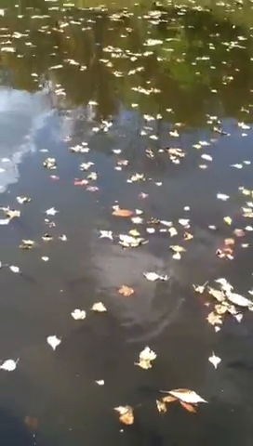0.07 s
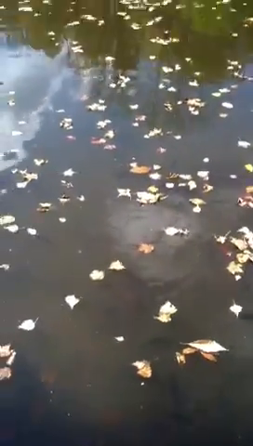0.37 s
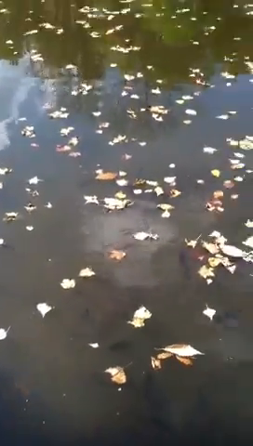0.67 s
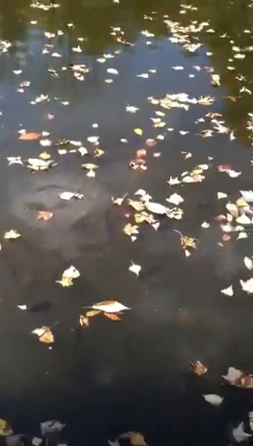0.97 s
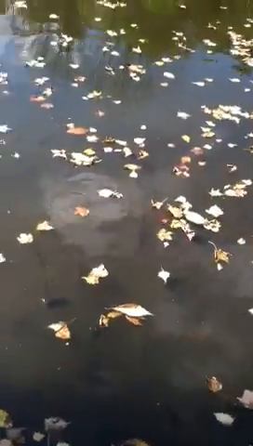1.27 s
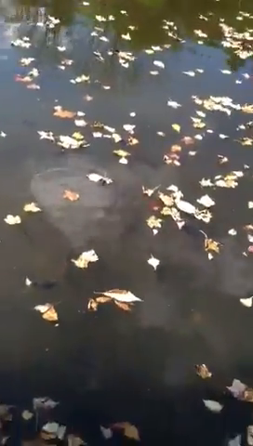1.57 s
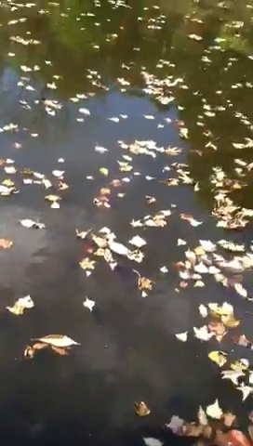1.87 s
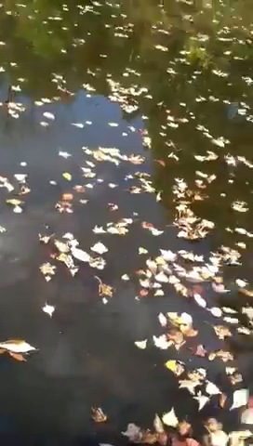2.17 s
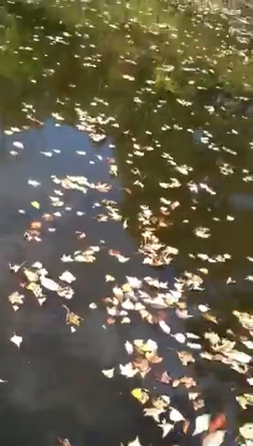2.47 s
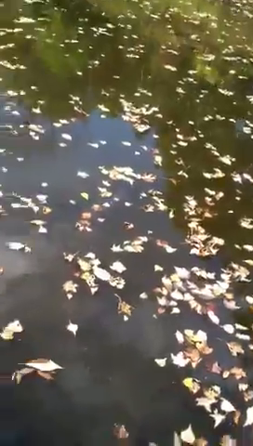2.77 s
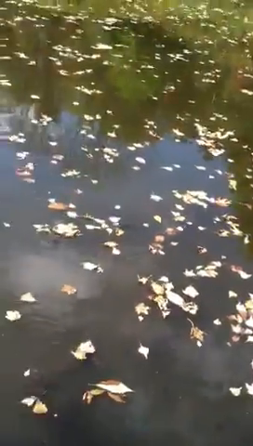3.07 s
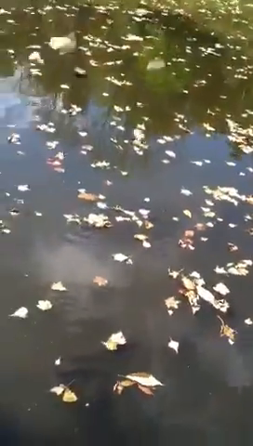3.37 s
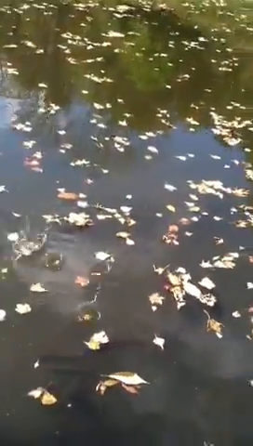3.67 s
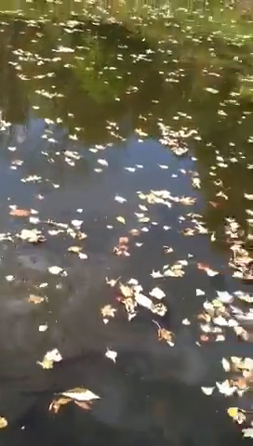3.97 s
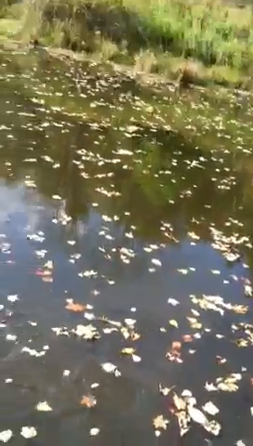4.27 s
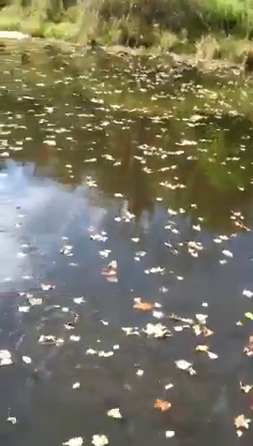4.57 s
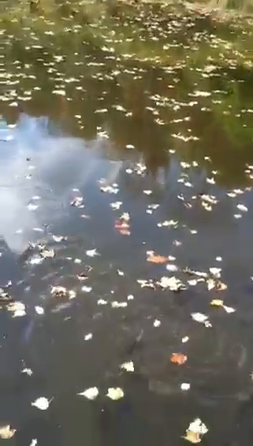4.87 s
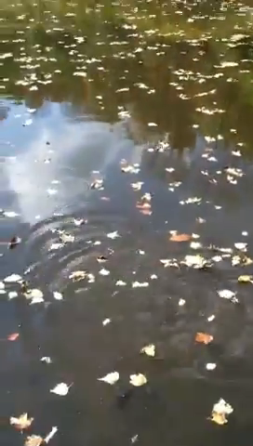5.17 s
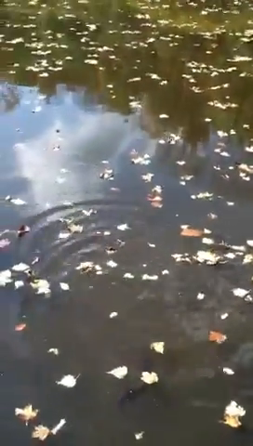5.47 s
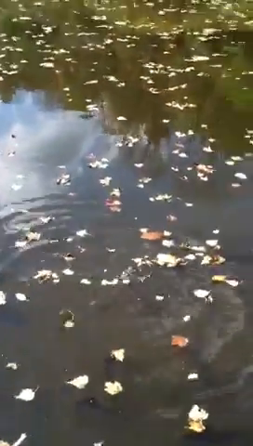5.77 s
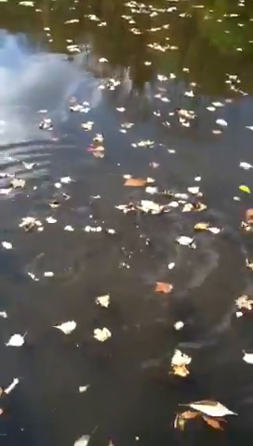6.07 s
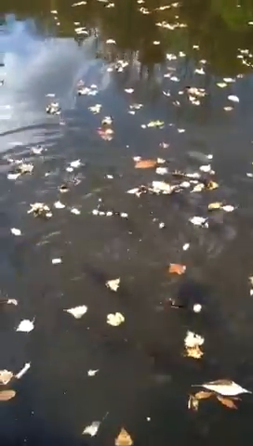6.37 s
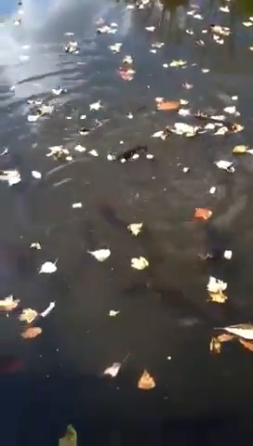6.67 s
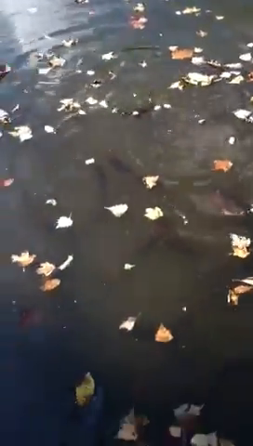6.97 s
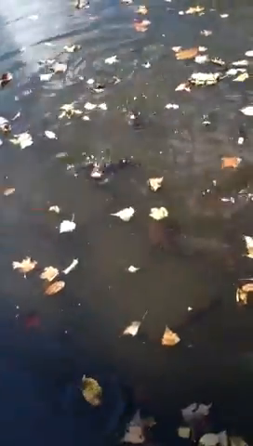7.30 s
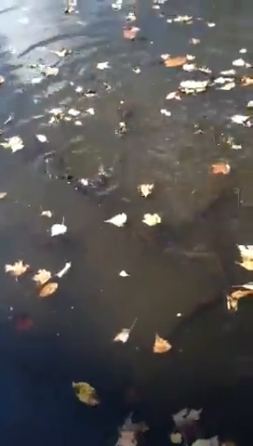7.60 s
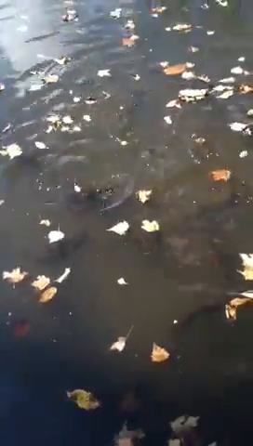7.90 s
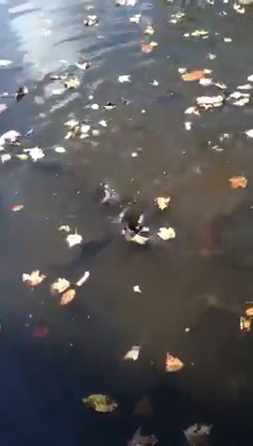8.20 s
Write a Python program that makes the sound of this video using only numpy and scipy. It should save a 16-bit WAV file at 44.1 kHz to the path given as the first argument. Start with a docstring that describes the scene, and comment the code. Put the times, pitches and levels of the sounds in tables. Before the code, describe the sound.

Close crackling and rustling of a stiff bag in two bouts, followed by little pond splashes and plops, with crickets shrilling faintly.

```python
"""A stiff bag of fish feed snaps, crinkles and rubs close by, handled in two bouts beside a still pond.
Its creases give way with cracks, and its wrinkles slip with tiny clicks. Feed patters on the water,
then fish take it with small splashes, a gulp and bubbles, whose trapped air rings on rising notes.
Crickets shrill in the grass all the while, over a faint hush of open air."""
import sys
import numpy as np
from scipy import signal
from scipy.fft import rfft, irfft, next_fast_len
from scipy.io import wavfile

SR = 44100
rng = np.random.default_rng(int(sys.argv[2]) if len(sys.argv) > 2 else 0)


def materialize(psi):
    """Save the field psi as 16-bit PCM at rate SR to the path in sys.argv[1].

    A 1-D psi becomes a single channel; in a 2-D psi each row is a channel.
    """
    bounded = np.clip(np.atleast_2d(psi).T, -1, 1)
    quanta = np.round(bounded * 32767).astype(np.int16)
    wavfile.write(sys.argv[1], SR, quanta)


N = 372204
TIME = np.arange(N) / SR
LEAD_S = .003   # run-up before each click
# how hard the hand holds the bag, one list per bout: time_s, relative_level_db
HOLD_BOUTS = [
    [(0.67, -60), (0.88, -47), (1.15, -43.5), (1.54, -51.5), (2.15, -49.5), (2.53, -46.5), (2.6, -48),
     (2.72, -65), (2.76, -66)],
    [(3.85, -57.5), (4.1, -42.5), (4.18, -50), (4.33, -52), (4.4, -46.5), (4.59, -56.5)],
]


def bag_snaps(effort, small_per_s=14, small_hz=2600):
    """Creases snap through, the small ones as hard as the hand works, amid hollow thumps and dull snaps."""
    # the loud creases: start_s, crack_hz, crack_db, flap_db
    loud_creases = [(0.101, 2500, -58, -47), (0.1362, 3070, -43.5, -54), (0.144, 1900, -43, -35),
                    (0.184, 2200, -35, -45), (0.288, 2000, -64, -50.5), (0.6717, 1490, -36, -37.5),
                    (0.7858, 2420, -45, -53), (0.937, 1620, -36.5, -40.5), (0.9649, 2580, -40, -40),
                    (0.988, 4100, -39, -43), (0.996, 3680, -36, -44), (1.0135, 3300, -35.5, -52),
                    (1.0602, 2350, -37, -38), (1.0693, 3760, -32, -36.5), (1.0865, 2750, -37, -38),
                    (1.1072, 4860, -38, -42), (1.1191, 2540, -39, -36), (1.1903, 5100, -34.5, -42),
                    (1.2015, 3930, -36, -31), (1.2686, 3030, -39, -37), (1.2986, 3600, -29, -39.5),
                    (1.3233, 5000, -28.5, -42), (1.3374, 2940, -31, -38), (1.375, 3360, -38, -42.5),
                    (1.4257, 2200, -32, -46), (1.4344, 3800, -34, -32), (1.503, 3800, -34, -40),
                    (1.5383, 2430, -39, -44), (1.6862, 5800, -33, -37), (1.7312, 2690, -32, -41.5),
                    (1.7748, 2900, -39.5, -45), (1.7897, 2000, -49, -36.5), (1.826, 1930, -33.5, -45),
                    (1.8653, 3830, -36.5, -39.5), (1.9178, 2800, -42, -39), (1.9792, 3120, -43.5, -38.5),
                    (2.0633, 4450, -36.5, -44.5), (2.1527, 4030, -41, -45), (2.2715, 3060, -41.5, -39),
                    (2.292, 4720, -35.5, -50), (2.3577, 4700, -33.5, -35), (2.3965, 2360, -37, -38),
                    (2.669, 1900, -37, -51), (2.711, 2540, -36, -47), (2.746, 1610, -43.5, -39),
                    (2.931, 3220, -50, -56), (2.9673, 2400, -42, -49), (3.0567, 2550, -47.5, -48),
                    (3.109, 3240, -51, -55), (3.884, 2360, -45.5, -49), (3.941, 2230, -42, -34),
                    (4.0126, 4800, -28.5, -40), (4.0215, 2830, -32, -54), (4.0835, 2030, -33.5, -37),
                    (4.0951, 2480, -31, -35), (4.1325, 2180, -27.5, -39.5), (4.1793, 2260, -32, -41),
                    (4.1896, 3340, -29, -41), (4.2168, 2320, -35, -46), (4.2245, 2880, -35, -36),
                    (4.2541, 2490, -43, -44), (4.2873, 2320, -33.5, -48), (4.3204, 3100, -30, -34),
                    (4.3486, 1850, -34.5, -36), (4.367, 2040, -44, -41), (4.4047, 1720, -26, -36),
                    (4.522, 1890, -37, -36.5), (4.5391, 1650, -39, -44), (4.5865, 1660, -48.5, -47),
                    (4.6848, 2090, -49, -52), (4.6983, 2200, -46.5, -46.5), (4.929, 2180, -44.5, -44)]
    # hollow thumps and dull snaps of the bag: start_s, pitch_hz, level_db
    thumps_and_dull_snaps = [(0.148, 234, -41), (.185, 280, -44.5), (.673, 1430, -38), (1.202, 260, -41),
                             (1.686, 217, -45), (2.668, 356, -34.5), (2.759, 317, -49), (3.05, 1090, -47.5)]
    out, creases = np.zeros(N), list(loud_creases)
    for bout in HOLD_BOUTS:
        start, end = bout[0][0], bout[-1][0]
        for when, size, force in rng.random((int(small_per_s * (end - start)), 3)):
            s = start + when * (end - start)
            level_db = 20 * np.log10(effort[int(s * SR)]) + 5 + 6 * (force - .5)
            creases.append((s, small_hz * 2 ** (size - .5), level_db, level_db - 5.5))
    second_bout_s = HOLD_BOUTS[1][0][0]
    for s, *crease in creases:
        add(out, s - LEAD_S, snap(*crease, edge_db=-23.5 if s < second_bout_s else -32))
    for s, hz, level_db in thumps_and_dull_snaps:
        add(out, s - LEAD_S, burst(hz, level_db, q=2.7, scatter=.28, scatter_s=.002, tail_db=-30))
    return out


def snap(crack_hz, crack_db, flap_db, edge_db):
    """A crease cracks; the panel around it flaps a moment later and shoves the air in the bag."""
    t = TIME[:SR // 100]
    edge = filtered(rng.standard_normal(len(t)) * np.exp(-t / .0008), [6800, 10500], "band")
    # higher and harder cracks have a sharper edge
    sharpness_db = 7 * np.log2(crack_hz / 3000) + .5 * (crack_db + 35)
    edge = from_db(crack_db + edge_db + sharpness_db) * rms_one(edge)
    flap_hz = 840 * 2 ** (.25 * rng.uniform(-1.25, 1))
    crack = burst(crack_hz, crack_db, q=2.5, scatter=1.6, scatter_s=.0011, tail_db=-24)
    flap = burst(flap_hz, flap_db, q=1.6, scatter=1.1, scatter_s=.0038, tail_db=-20)
    shove = burst(200, flap_db - 13, q=1.4, scatter=.71, scatter_s=.0036, tail_db=-30)
    out = np.zeros(SR // 10)
    for delay_s, part in [(0, crack), (LEAD_S, edge), (.00043, flap), (.0011, shove)]:
        add(out, delay_s, part)
    return out


def bag_rustle(effort, slide, clump_db=2.5):
    """Tiny slips: dull ones in the bag's wall, crisp ones in the wrinkles, fine ones where it slides."""
    # drags that make a tight panel sing: middle_s, length_s, pitch_hz, width_hz, level_db
    drags = [(.725, 0.049, 3820, 220, -47), (0.724, 0.063, 4260, 400, -49),
             (0.745, 0.065, 2400, 500, -52.5), (2.47, 0.072, 3220, 400, -51.5), (2.585, .1, 3660, 800, -50),
             (2.66, 0.063, 1830, 160, -46), (4.461, 0.048, 3900, 1500, -52)]
    wall = crinkles(per_s=2200, spread_db=5, low_hz=160, high_hz=1153, q=4.35, db_per_octave=.96)
    wall = filtered(filtered(wall, 86, "high"), 1720, "low")
    wrinkles = crinkles(per_s=2200, spread_db=6, low_hz=1410, high_hz=4880, q=4.6, db_per_octave=-5.5)
    wrinkles = filtered(filtered(wrinkles, 790, "high"), 6700, "low", order=3)
    hiss = grains(per_s=5900, spread_db=4.5)
    hiss = filtered(filtered(hiss, 3340, "high", order=3), 7700, "low", order=3)
    creasing = from_db(.5) * rms_one(wall) + rms_one(wrinkles)
    # slips come in clumps, so the level flickers
    flicker = rms_one(filtered(rng.standard_normal(N), 70, "low"))
    clumps = rms_one(from_db(clump_db * flicker))
    return swell(drags) + effort * clumps * creasing + slide * rms_one(hiss)


def crinkles(per_s, spread_db, low_hz, high_hz, q, db_per_octave, sizes=14):
    """Each slip lands on a wrinkle of some size, which rings briefly at its own pitch."""
    clicks = grains(per_s, spread_db)
    wrinkle = rng.integers(0, sizes, N)
    return sum(from_db(db_per_octave * np.log2(hz / low_hz)) * resonate(clicks * (wrinkle == k), hz, q)
               for k, hz in enumerate(np.geomspace(low_hz, high_hz, sizes)))


def hand(fade_s=.019):
    """How hard the hand works and slides, as loudness curves: a hold through each bout, plus strokes."""
    # strokes of the hand in the bag: middle_s, length_s, effort_db, hiss_db
    strokes = [(0.154, .025, -52, -62), (0.731, 0.11, -56, -53), (0.863, .05, -45.5, -54.5),
               (0.967, 0.054, -49.5, -62), (1.052, .08, -44.5, -62), (1.196, 0.063, -39.5, -56),
               (1.34, .07, -55, -58), (1.502, 0.049, -50, -65), (1.589, .06, -54, -69),
               (1.71, 0.073, -48.5, -72), (2.094, 0.072, -52, -61), (2.32, 0.14, -45.5, -58),
               (2.43, 0.19, -59, -49), (2.499, 0.028, -48.5, -57), (2.585, 0.054, -49, -54),
               (2.664, .11, -42, -50.5), (3.06, 0.23, -65, -71), (3.955, 0.066, -48.5, -54),
               (4.099, 0.041, -41.5, -60), (4.212, 0.048, -46, -56), (4.412, 0.044, -54.5, -57),
               (4.736, 0.24, -65.5, -77)]
    hold = np.zeros(N)
    for bout in HOLD_BOUTS:
        s, db = np.transpose(bout)
        held = np.clip(1 + np.minimum(TIME - s[0], s[-1] - TIME) / fade_s, 0, 1)
        hold += held * from_db(np.interp(TIME, s, db) - 6)
    effort_power, slide_power = hold ** 2, (from_db(-6.5) * hold) ** 2
    for s, length_s, effort_db, hiss_db in strokes:
        stroke = np.exp(-np.minimum((2 * (TIME - s) / length_s) ** 2, 50))   # a smooth rise and fall
        effort_power += (from_db(effort_db) * stroke) ** 2
        slide_power += (from_db(hiss_db) * stroke) ** 2
    return np.sqrt(effort_power), np.sqrt(slide_power)


def splashes(hollow_hz=840, droplets=6):
    """A slap throws up spray and mist; the hollow closes with a lower note and droplets fall back."""
    # slaps on the water: start_s, spray_hz, spray_db, hollow_db, spatter_s
    slaps = [(3.795, 3000, -46, -53, 0.014), (3.856, 4830, -45, -55, 0.0079), (5.292, 2500, -66, -53, .005),
             (5.533, 3000, -57, -50, 0.0018), (5.58, 2150, -48.5, -52, .001),
             (5.642, 3100, -46, -68, .0017), (5.731, 4730, -52.5, -62, .001),
             (6.628, 2000, -55, -58.5, .004), (6.890, 2540, -54, -51, .003),
             (6.9588, 2200, -46.5, -48, 0.0021), (6.9661, 2600, -49.5, -35.5, .006),
             (7.141, 1800, -65, -49.5, .007), (7.1802, 3800, -36, -36.5, 0.0047),
             (7.195, 1900, -50, -60, .003), (7.356, 2200, -50.5, -49.5, .005),
             (7.5313, 2280, -45.5, -49, 0.0045), (8.1994, 2200, -37, -38, 0.003),
             (8.344, 4800, -47, -68, .005), (8.3735, 1880, -40, -52, 0.0066)]
    out, t = np.zeros(N), TIME[:SR // 10]
    for s, spray_hz, spray_db, hollow_db, spatter_s in slaps:
        spray = burst(spray_hz, spray_db, q=1.7, scatter=1.3, scatter_s=spatter_s, tail_db=-14)
        hollow = burst(hollow_hz, hollow_db, q=2.1, scatter=2, scatter_s=spatter_s, tail_db=-22)
        mist = filtered(rng.standard_normal(len(t)) * np.exp(-t / .006), [8800, 12000], "band")
        mist_db = spray_db - 7 + 3 * np.log2(spray_hz / 3000)   # higher-pitched spray has more mist
        add(out, s - LEAD_S, spray)
        add(out, s - LEAD_S + .001635, hollow)
        add(out, s, from_db(mist_db) * mist)
        for delay, size, force in rng.random((droplets, 3)):
            drop_hz = 600 * 6 ** size
            add(out, s + .16 * delay, bubble(drop_hz, spray_db - 13.5 - 10 * force, 6 / drop_hz))
    return out


def gulp(start_s=6.9584, length_s=.0191, start_hz=1800, fade_db=6):
    """A fish sucks in air: the pocket rings higher as it shrinks, pushed five times, ever more weakly."""
    out, t = np.zeros(N), TIME[:SR // 10]
    hz = start_hz * 2 ** (.4 * np.minimum(t / length_s, 1.1) ** 2)
    note = np.sin(2 * np.pi * np.cumsum(hz) / SR)
    pushes = np.zeros(len(t))
    for progress in np.linspace(0, 1, 5):
        age_s = t - progress * length_s
        pushes += from_db(-fade_db * progress) * (age_s >= 0) * np.exp(-np.abs(age_s) / .0036)
    add(out, start_s, from_db(-28.5) * filtered(pushes, 500, "low") * note)
    return out


def fish_bubbles(per_stir=6, low_hz=1405, high_hz=3300):
    """Feeding fish let go single large bubbles, and a few small ones wherever they stir the surface."""
    # single large bubbles: start_s, pitch_hz, level_db, decay_s
    large_bubbles = [(3.273, 480, -46.5, 0.0026), (3.468, 500, -48, 0.0031), (5.984, 1595, -45, .009),
                     (5.997, 2430, -49, .0055), (5.999, 965, -56, .014), (6.067, 2750, -45, 0.0045),
                     (6.861, 413, -48.5, 0.0047), (6.875, 1500, -49.5, .004), (7.083, 393, -52, .005),
                     (7.355, 755, -52.5, 0.027), (7.391, 1230, -45, 0.0095), (7.539, 1064, -47, 0.0087),
                     (7.676, 1860, -45, .0067), (8.243, 400, -52, .008), (8.317, 680, -48, .012),
                     (8.345, 1830, -48, .005), (8.357, 1120, -43.5, 0.0039), (8.3865, 836, -41, 0.012),
                     (8.395, 2130, -37.5, .0047), (8.414, 330, -52, .012)]
    # fish stirring the surface: middle_s, length_s, level_db
    stirs = [(5.97, .12, -56), (6.909, 0.077, -56), (8.351, .11, -51)]
    out = np.zeros(N)
    for s, hz, level_db, decay_s in large_bubbles:
        add(out, s, bubble(hz, level_db, decay_s))
    for s, length_s, level_db in stirs:
        for when, size, force in rng.random((per_stir, 3)):
            hz = low_hz * (high_hz / low_hz) ** size
            add(out, s + length_s * (when - .5), bubble(hz, level_db + 6 * (force - .5), 7 / hz))
    return out


def bubble(start_hz, level_db, decay_s, octaves_per_s=11):
    """Trapped air rings as a dying note whose pitch climbs as it nears the surface."""
    t = TIME[:SR // 10]
    phase = 2 * np.pi * np.cumsum(start_hz * 2 ** (octaves_per_s * t)) / SR
    fade_in = 1 - np.exp(-t / .00045)
    return from_db(level_db) * np.sin(phase) * np.exp(-t / decay_s) * fade_in


def bank_echo(x, level_db, decay_s):
    """Ground and grass scatter the sound back as a faint, dull tail."""
    t = TIME[:SR // 3]
    tail = rng.standard_normal(len(t)) * np.exp(-t / decay_s) * (t > .005)
    tail = filtered(tail, 3500, "low", order=1)
    return from_db(level_db) * signal.fftconvolve(x, tail / np.linalg.norm(tail))[:N]


def insects():
    """Distant crickets blend into a steady shrill; one nearer insect buzzes higher, in short phrases."""
    # cricket choruses: pitch_hz, width_hz, level_db
    crickets = [(4410, 310, -70.5), (6410, 91, -73.5), (7180, 510, -64), (7670, 460, -68.5)]
    # the nearer insect's phrases: middle_s, level_db
    buzzes = [(.34, -68), (2.14, -66), (2.90, -69), (3.25, -72), (3.60, -72)]
    chorus = sum(from_db(db) * narrow_noise(hz, width_hz) for hz, width_hz, db in crickets)
    return chorus + swell([(s, .08, 8680, 220, db) for s, db in buzzes])


def open_air(hush_db=-65):
    """A steady hush with a few far-off swells."""
    # how strong the hush is from low to high: pitch_hz, relative_level_db
    hush_shape = [(25, -16), (60, -30), (100, -11), (160, 2.5), (350, 0), (700, -1.5), (1200, -4),
                  (2200, -5), (3500, -6), (5500, -11), (9000, -16.5), (12000, -24.5), (16000, -34)]
    # faint far-off swells and whistles: middle_s, length_s, pitch_hz, width_hz, level_db
    far_swells = [(0.64, 0.31, 650, 427, -59), (0.612, 0.22, 2250, 250, -69), (3.43, 0.084, 3150, 110, -66),
                  (5.015, 0.75, 670, 450, -63.5), (5.026, 0.22, 3130, 140, -68),
                  (7.63, 0.48, 704, 400, -65)]
    hz, db = np.transpose(hush_shape)
    hush = shaped_noise(lambda f: from_db(np.interp(np.log(f), np.log(hz), db)))
    return from_db(hush_db) * hush + swell(far_swells)


def burst(hz, level_db, q, scatter, scatter_s, tail_db):
    """A click among smaller ones rings two notes; level_db is for its energy spread over 3 ms."""
    t = TIME[:SR // 14] - LEAD_S
    # small slips build up to the click and die away after it
    build_up = .5 * np.exp(-np.abs(t) / .00049)
    die_away = np.exp(-np.abs(t) / scatter_s) + from_db(tail_db) * np.exp(-np.abs(t) / .013)
    push = rng.standard_normal(len(t)) * np.where(t < 0, build_up, die_away)
    push *= scatter / np.linalg.norm(push)
    push[int(LEAD_S * SR)] += rng.choice([-1, 1])   # the main click
    upper_hz = min(hz * rng.uniform(1.3, 3.05), 7800)   # every spot has its own upper note
    sound = resonate(push, hz, q) + .32 * resonate(push, upper_hz, 2 * q)
    # the air cannot carry the slow part of so small a motion
    sound = filtered(sound, hz * .17, "high", order=1)
    sound = filtered(sound, min(hz * 2.5, 8400), "low", order=3)
    return from_db(level_db) * sound / np.linalg.norm(sound) * np.sqrt(.003 * SR)


def grains(per_s, spread_db):
    """Random clicks of very uneven size."""
    sizes = from_db(spread_db * np.minimum(rng.exponential(1, N), 4))
    return sizes * rng.choice([-1, 1], N) * (rng.random(N) < per_s / SR)


def swell(rows):
    """Pitched noises that fade smoothly in and out, one per row."""
    out = np.zeros(N)
    for middle_s, length_s, hz, width_hz, level_db in rows:
        t = TIME[np.abs(TIME - middle_s) < 2 * length_s]
        loudness = from_db(level_db) * np.exp(-(2 * (t - middle_s) / length_s) ** 2)
        add(out, t[0], loudness * narrow_noise(hz, width_hz, count=len(t)))
    return out


def narrow_noise(centre_hz, width_hz, count=N):
    """Noise gathered around one pitch."""
    return shaped_noise(lambda hz: 1 / (1 + ((hz - centre_hz) / (.75 * width_hz)) ** 2), count)


def shaped_noise(gain_at, count=N):
    """Noise whose strength at each pitch follows gain_at(hz)."""
    size = next_fast_len(count)
    hz = np.maximum(np.arange(size // 2 + 1) * SR / size, 1)
    return rms_one(irfft(rfft(rng.standard_normal(size)) * gain_at(hz), size)[:count])


def resonate(x, hz, q):
    """Ring at one pitch; a higher q rings longer."""
    return signal.lfilter(*signal.iirpeak(min(hz, SR / 4), max(q, .6), fs=SR), x)


def filtered(x, hz, kind, order=2):
    """Keep the "low" part, the "high" part or a "band" of a sound."""
    sections = signal.butter(order, np.clip(hz, 10, .45 * SR), kind, fs=SR, output="sos")
    return signal.sosfilt(sections, x + 1e-18)


def add(out, s, sound):
    """Mix a short sound in at s seconds."""
    i = int(s * SR)
    out[i:i + len(sound)] += sound[:max(N - i, 0)]


def rms_one(x):
    """Scale to an average (rms) level of 1."""
    return x / np.sqrt(np.mean(x ** 2) + 1e-20)


def from_db(db):
    """Turn decibels into a multiplier."""
    return 10 ** (np.asarray(db) / 20)


def scene():
    """Bag and water close by, insects and air all around."""
    effort, slide = hand()
    near = bag_snaps(effort) + bag_rustle(effort, slide) + splashes() + fish_bubbles() + gulp()
    return (near + bank_echo(near, level_db=-29.5, decay_s=.038) + insects() + open_air())[None]


def record(dry, cutoff_hz=15900):
    """The microphone thins the bass and lifts a narrow band of treble; the very top is cut."""
    thin = filtered(dry, 47, "high", order=1)
    bright = thin + .22 * resonate(thin, 9230, q=17)
    return signal.sosfilt(signal.ellip(10, .1, 80, cutoff_hz, fs=SR, output="sos"), bright)


dry = scene()
out = record(dry)
materialize(out)
```